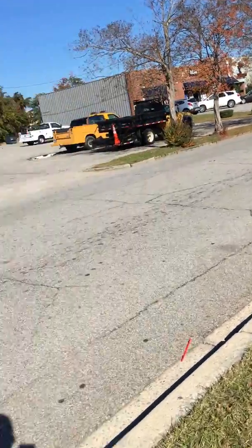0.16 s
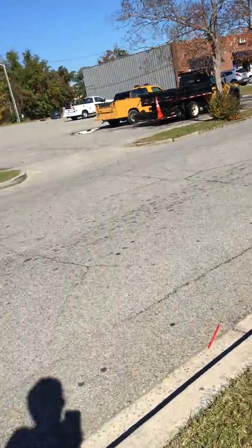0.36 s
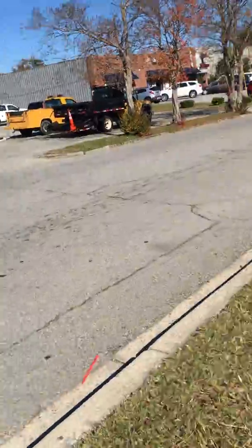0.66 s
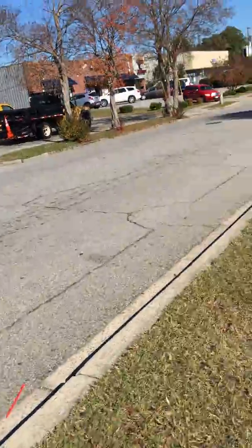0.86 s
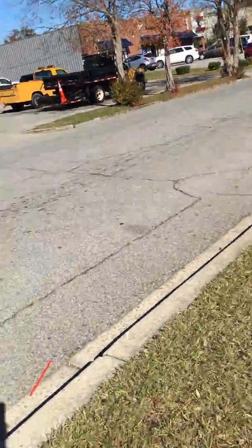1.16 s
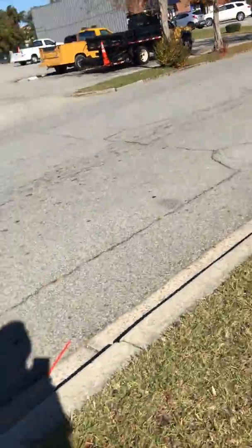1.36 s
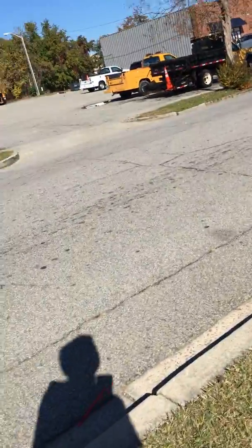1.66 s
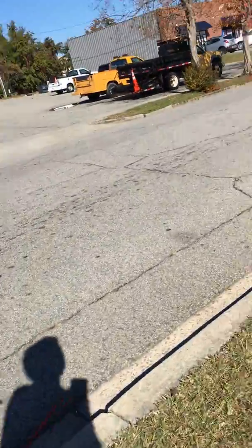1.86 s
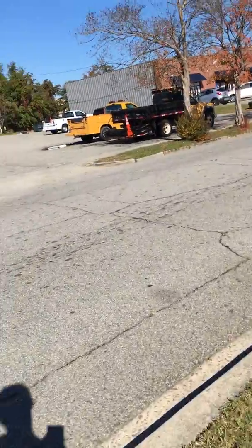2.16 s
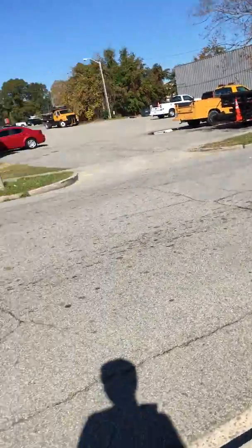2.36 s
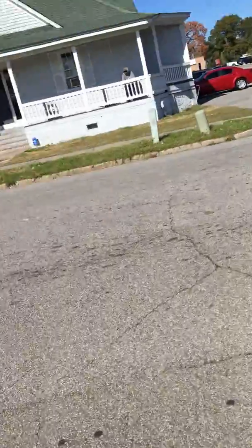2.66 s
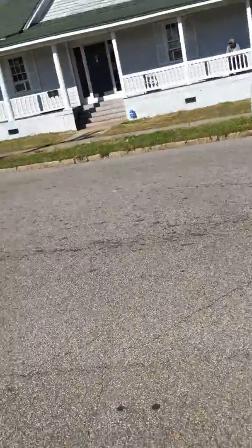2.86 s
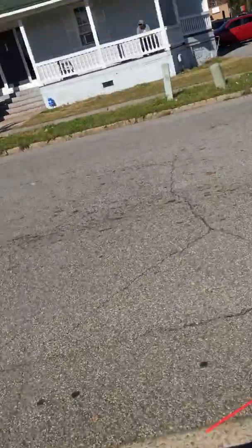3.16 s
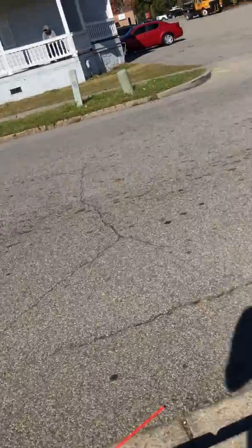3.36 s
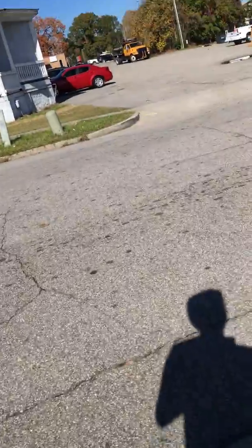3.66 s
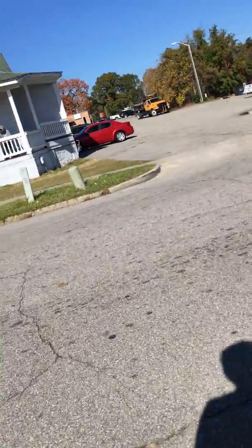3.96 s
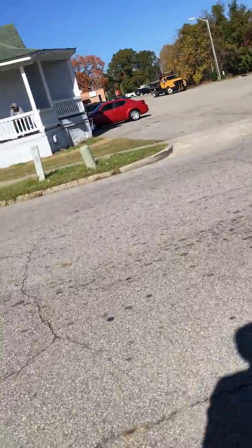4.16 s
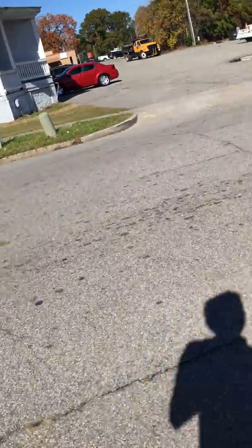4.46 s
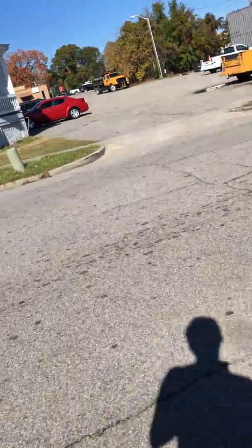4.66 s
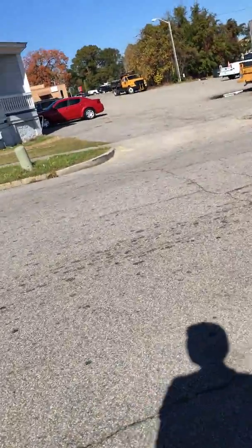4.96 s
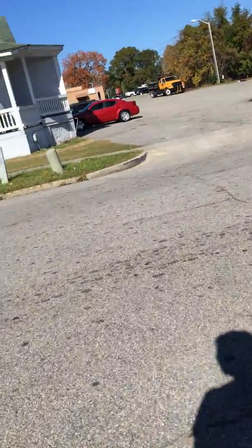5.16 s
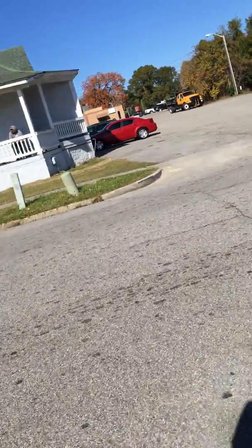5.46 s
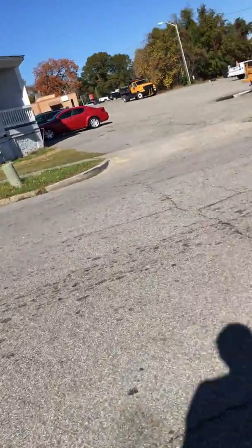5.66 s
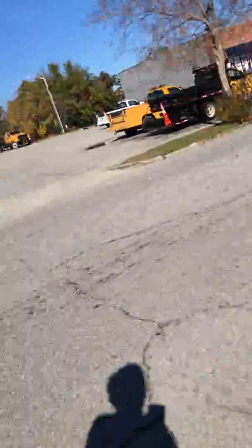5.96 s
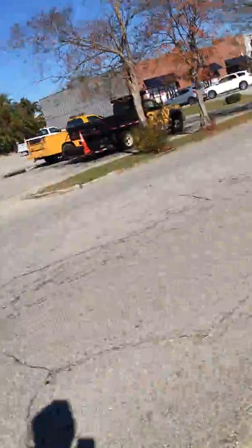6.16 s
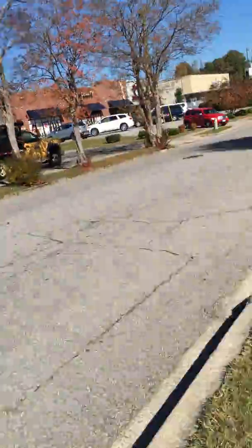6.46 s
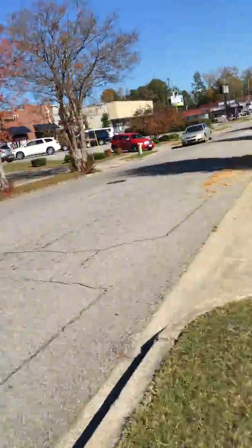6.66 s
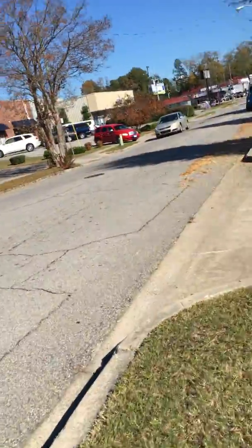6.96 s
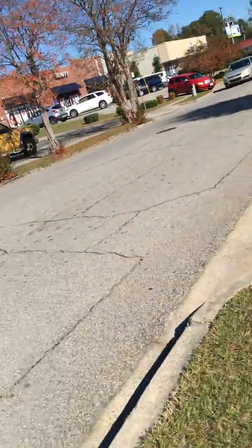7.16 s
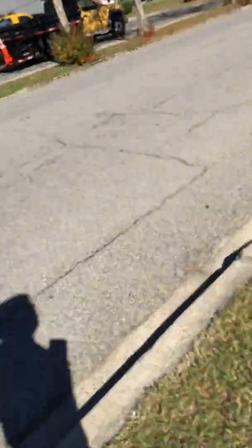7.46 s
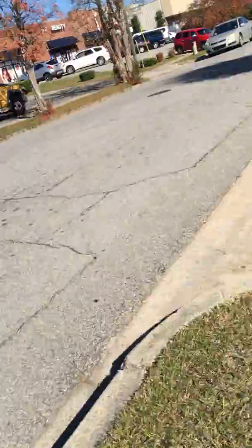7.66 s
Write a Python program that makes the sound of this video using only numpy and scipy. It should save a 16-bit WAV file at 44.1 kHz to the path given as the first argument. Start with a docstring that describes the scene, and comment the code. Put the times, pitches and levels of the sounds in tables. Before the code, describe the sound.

Distant traffic rumbles throughout, heard outdoors from a side street, with a soft tyre hiss and low exhaust notes that swell and fade, strongest around 2.5, 3.5 and 5 seconds. A parked diesel truck hums and rattles quietly underneath, and insects trill very faintly. The microphone takes three dull bumps in the first second. Close by, feet shuffle softly on dry grass, with light swishes and tiny stalk snaps scattered from about 1 second onward, clearer around 3.4, 4.3 and 5 seconds. From about 5.2 seconds an approaching car adds a low engine drone, and its tyre noise slowly grows toward the end. Two more dull bumps hit the microphone at about 6.5 seconds. A barely audible, thin, high brake squeak rises between 7.1 and 7.5 seconds, ending with a small crisp snap of grass while the traffic carries on.

```python
"""Side street beside a busy road.

Distant traffic rumbles and hisses; low exhaust notes swell and fade. A parked diesel hums, knocks and
rattles. Insects scrape trills in the verge. Close by, feet shuffle on dry grass, stalks snap and the
microphone housing takes a few dull bumps. Late on, a car rolls nearer with a thin brake squeak."""
import sys
import numpy as np
from scipy import signal
from scipy.fft import rfft, irfft, next_fast_len
from scipy.io import wavfile

SR = 44100
rng = np.random.default_rng(int(sys.argv[2]) if len(sys.argv) > 2 else 0)


def unload_audio(sound):
    """Save the sound as a 16-bit wav file, at the path given as the first command line argument."""
    columns = np.transpose(np.atleast_2d(sound))
    # keep every value between -1 and 1, then stretch to whole-number steps
    steps = np.round(np.clip(columns, -1, 1) * 32767)
    wavfile.write(sys.argv[1], SR, steps.astype(np.int16))


N = 343980

# Each row: pulse rate in Hz, wing resonance in Hz, width in Hz, relative level in dB.
INSECT_SONGS = [(111, 5370, 230, -77.5), (41.2, 5450, 320, -81), (16.24, 5330, 280, -81),
                (70.8, 6350, 200, -83.5)]
# Each row: time in seconds, level of all insects in dB.
CHORUS_LEVEL = [(0, -72), (.9, -72.5), (2.5, -68.5), (2.7, -74), (3, -80), (3.28, -69.5), (5.2, -71),
                (5.42, -70), (5.5, -75), (6.2, -75), (6.35, -71), (6.6, -71), (7.13, -67), (7.47, -71),
                (7.8, -63)]
# Diesel hum. Each row: multiple of the firing rate, level in dB.
IDLE_ORDERS = [(1, -50.5), (5, -62), (9, -57.5), (10, -72.5)]
# Diesel resonances. Each row: centre in Hz, width in Hz, level in dB.
BLOCK_MODES = [(980, 560, -81.5), (1730, 740, -64.5), (3380, 1500, -77.5)]
PANEL_MODES = [(1100, 530, -62.5), (1980, 1800, -82.5)]
# Noise spectra. Each row: frequency in Hz, relative density in dB.
RUMBLE_SPECTRUM = [(20, -24), (35, -6), (50, -2), (70, -1), (100, -1.5), (140, -10), (180, -12.5),
                   (260, -30.5)]
ROAR_SPECTRUM = [(76, -44.5), (130, -11), (156, -5), (249, -7), (349, -12.5), (398, -21), (496, -25.5),
                 (700, -36), (910, -67.5), (1540, -120)]
FAR_TYRE_SPECTRUM = [(240, -14), (400, -0.5), (503, -5.5), (738, -6.5), (860, -4.5), (1080, -7.5),
                     (1190, -6.5), (1400, -10.5), (2400, -17), (2760, -24), (3360, -24.5), (4930, -29.5),
                     (5400, -25), (6800, -39), (15600, -59.5)]
NEAR_TYRE_SPECTRUM = [(350, -34), (550, 1.5), (950, 1.5), (1400, 3), (1900, -2.5), (2700, -31),
                      (3400, -16.5), (5000, -22), (8000, -31), (15600, -51)]
CRACKLE_SPECTRUM = [(2000, -17), (3500, 12.5), (6000, -5.5), (9000, 5), (12000, 0.5), (15700, -2.5)]
SWISH_SPECTRUM = [(1200, 1), (2500, 9), (4000, 5.5), (6000, 1), (8500, -7), (11000, -15), (15700, -23)]
# Far engine rumble and near tyres. Each row: time in seconds, level in dB.
RUMBLE_LEVEL = [(0, -36), (.3, -34.5), (.52, -33.5), (.63, -40), (.9, -32), (1.1, -41), (1.34, -35.5),
                (1.95, -34.5), (2.47, -32.5), (3, -39), (3.65, -31), (3.8, -38), (4.3, -33), (5, -33.5),
                (5.4, -35), (5.6, -39), (6.36, -33), (6.56, -43.5), (6.7, -34.5), (7.5, -37.5),
                (7.75, -43.5)]
NEAR_TYRE_LEVEL = [(5.2, -61), (5.8, -57), (6.3, -55), (6.7, -50.5), (7.1, -48.5), (7.5, -51), (7.8, -44)]
# Each row: time in seconds, body roar in dB, tyre hiss in dB.
TRAFFIC_LEVELS = [(0, -49.5, -48.5), (.7, -45, -48), (1.5, -46.5, -50), (2.1, -45, -50), (2.6, -47.5, -51),
                  (3.05, -45, -51), (3.5, -46.5, -49), (4, -45, -49.5), (4.5, -44.5, -49.5), (5, -46, -50),
                  (5.3, -42, -48.5), (5.7, -44.5, -49), (6.1, -45, -49.5), (7, -45.5, -48),
                  (7.8, -43.5, -49)]
# Road noise bands. Each row: centre in Hz, width in Hz, steady level in dB, swells.
# Each swell: start in seconds, length in seconds, level in dB.
RINGING_BANDS = [(950, 65, -63, [(-.1, .4, -65), (.5, 0.55, -62), (2.6, 0.24, -62), (4.1, .7, -62.5),
                 (6.25, .75, -54.5), (7.45, .6, -53)]), (1208.5, 95, -63, [(.75, 0.99, -60),
                 (2.05, .4, -70), (3.35, 1.37, -74), (6, 1.0, -63), (7.4, 0.46, -69)]),
                 (3365, 140, -76.5, [(-.1, 2.2, -77), (3.3, .3, -78), (6.2, 0.41, -70), (6.85, 1.17, -73)])]
# Three engine drones, one list each: two in the distant traffic, then the approaching car's.
# Each row: time in seconds, pitch in Hz, level in dB.
ENGINE_TRACKS = [
    [(.15, 127.1, -43), (.35, 127.4, -39.5), (1.2, 135, -40), (2.1, 135.4, -43), (2.4, 136.4, -47),
     (3.3, 139.1, -40), (4.05, 140.9, -52.5)],
    [(1.4, 119.5, -41), (1.7, 119, -34.5), (2.4, 121.3, -38.5), (3, 122.9, -45.5), (3.6, 124.7, -42.5),
     (4.5, 125.4, -45.5), (4.8, 123.3, -36), (5.05, 122, -42)],
    [(5.22, 112, -39), (5.35, 112.4, -36), (5.69, 112.3, -44), (5.87, 105.7, -30), (6.09, 101.8, -30),
     (6.3, 102.7, -35.5), (6.38, 102.8, -27), (6.53, 103.3, -44), (6.68, 102.8, -32), (7, 103.4, -35),
     (7.17, 105.7, -32.5), (7.62, 105.3, -38), (7.75, 100, -49)],
]
# Each row: start in seconds, length in seconds, first pitch in Hz, last pitch in Hz, level in dB.
EXHAUST_NOTES = [(-.1, 0.7, 72.5, 73.1, -33), (.7, .29, 73, 69.2, -33), (.25, 1.1, 140.7, 151.5, -46),
                 (1.25, 0.21, 80.8, 84.6, -32), (1.3, 0.7, 95.5, 101, -44), (1.72, 0.18, 74.4, 74.6, -30),
                 (2.06, 0.28, 64.1, 61, -27.5), (2.42, 0.096, 60.2, 58.3, -23), (2.53, .2, 61.4, 59, -29.5),
                 (2.72, 0.34, 57.8, 55.7, -27.5), (2.7, 0.47, 167.3, 170.8, -43),
                 (3, 0.92, 85.66, 91.2, -40), (3.7, 0.34, 90.2, 93, -49), (3.42, 0.18, 59.5, 57.4, -23),
                 (3.8, 0.63, 53.4, 54.9, -36), (4.33, 0.077, 103, 103, -29),
                 (4.48, 0.21, 102.5, 107, -30.5), (4.42, 0.32, 164, 165, -43.5),
                 (4.5, 0.55, 67, 64.3, -30.5), (4.78, 0.13, 62.1, 56, -30.5),
                 (4.85, 0.29, 52.9, 50.9, -25.5), (4.68, 0.21, 210, 213, -42), (5.25, 0.34, 84, 84.5, -37),
                 (5.55, 0.5, 84.2, 89, -40), (5.6, .58, 56.5, 59.3, -32.5), (5.68, 0.23, 217, 206, -50.5),
                 (5.95, 0.28, 175.3, 183.9, -40.5), (6.22, 0.1, 60, 59.3, -25),
                 (6.8, 0.86, 60.7, 61.3, -35.5), (7.05, 0.42, 45.5, 45.4, -40),
                 (7.35, 0.45, 168.2, 166, -47)]
# Brake squeak. Each row: time in seconds, pitch in Hz, level in dB.
SQUEAK_TRACK = [(7.1, 11900, -96), (7.3, 12400, -92), (7.41, 12650, -92), (7.44, 12830, -83),
                (7.514, 12893, -86), (7.53, 12800, -80)]
# Short impacts. Each row: start in seconds, peak in dB, centre in Hz.
HOUSING_BUMPS = [(.015, -21.5, 208), (.519, -20.5, 93.5), (.949, -20, 102), (6.439, -24, 182),
                 (6.476, -21.5, 129.5)]
STALK_SNAPS = [(0.8738, -61, 9100), (1.165, -60, 12300), (1.265, -62, 10000), (1.379, -62, 11000),
               (1.4778, -60, 11000), (2.36, -63, 11260), (2.80, -64, 11000), (3.1328, -53, 7150),
               (3.297, -49, 6000), (3.4058, -49, 12400), (3.412, -50, 13000), (3.45, -47, 12000),
               (3.516, -46, 7970), (4.3316, -51, 10200), (4.5052, -55, 7020), (4.6299, -53, 9000),
               (5.0927, -45, 12500), (5.8522, -54, 10100), (6.42, -52, 14200), (6.6946, -46, 9080),
               (7.3064, -58, 7400), (7.4052, -56, 9030), (7.5263, -39.5, 12500)]
# Constant stir of the grass. Each row: time in seconds, crackle in dB, swish in dB.
GRASS_STIR = [(0, -78, -64), (1.5, -81, -73), (2.5, -79.5, -73.5), (3.5, -78, -71), (4.2, -81.5, -71),
              (6, -83, -81.5), (6.7, -79.5, -67.5), (7.8, -77, -67)]
# Each row: start in seconds, hold in seconds, rise in dB/s, fall in dB/s, crackle in dB, swish in dB.
FOOT_SCUFFS = [(1.15, 0.18, 40, 35, -82.5, -66.5), (1.96, .03, 150, 60, -84, -76),
               (2.8, 0.018, 150, 150, -91, -73), (3.22, .1, 200, 60, -76, -64),
               (3.41, .03, 900, 100, -69, -76), (3.464, 0.065, 201, 600, -66, -64.5),
               (3.615, 0.055, 100, 52, -78, -68), (4.235, .05, 150, 95, -78, -67),
               (4.335, 0.033, 600, 350, -68.5, -62), (4.437, 0.018, 100, 200, -78, -75),
               (4.61, 0.052, 70, 85, -83, -65), (4.936, 0.018, 106, 100, -82, -76),
               (5.064, .04, 298, 700, -70, -68), (5.14, 0.036, 100, 70, -77, -71),
               (5.493, 0.091, 89, 300, -74, -73), (5.666, 0.11, 600, 100, -70, -70),
               (6.24, 0.06, 199, 60, -74.5, -72), (6.37, 0.034, 120, 500, -64.5, -72),
               (6.537, 0.045, 64, 58, -84, -67), (6.929, .03, 100, 80, -80, -64),
               (7.4, .15, 33, 40, -78, -79)]
# Microphone port cavities. Each row: centre in Hz, width in Hz, depth from 0 to 1.
PORT_NOTCHES = [(4970, 390, 0.33), (10370, 850, 0.4)]


def from_db(db):
    """Decibels to gain."""
    return 10 ** (np.asarray(db) / 20)


def unit_rms(x):
    """Scale to rms 1."""
    return x / np.sqrt(np.mean(x ** 2) + 1e-20)


def curves(rows):
    """Each column after the time, interpolated over all samples."""
    times_s, *columns = np.transpose(rows)
    return [np.interp(np.arange(N) / SR, times_s, column) for column in columns]


def drift(rate_hz):
    """Low-passed random wander, spread 1."""
    step, settle = 40, 2000
    pole = np.exp(-2 * np.pi * rate_hz * step / SR)
    noise = rng.standard_normal(N // step + settle + 2)
    slow = signal.lfilter([1], [1, -2 * pole, pole * pole], noise)[settle:]
    return np.interp(np.arange(N) / step, np.arange(len(slow)), unit_rms(slow - slow.mean()))


def coloured(white, spectrum):
    """Shape a white signal to a spectrum; rms 1."""
    hz, level_db = np.transpose(spectrum)
    size = next_fast_len(N)
    bins_hz = np.maximum(np.arange(size // 2 + 1) * SR / size, 1)
    gain = from_db(np.interp(np.log(bins_hz), np.log(hz), level_db, left=-120, right=-120))
    return unit_rms(irfft(rfft(white, size) * gain, size)[:N])


def lumpy_noise(spectrum, level_db, lumps_db, rate_hz):
    """Coloured noise with a wandering level."""
    return from_db(level_db + lumps_db * drift(rate_hz)) * coloured(rng.standard_normal(N), spectrum)


def resonance(x, hz, width_hz):
    """Two-pole peak, gain 1."""
    r = np.exp(-np.pi * width_hz / SR)
    feedback = [1, -2 * r * np.cos(2 * np.pi * hz / SR), r * r]
    return signal.lfilter(np.array([1, 0, -1]) * (1 - r * r) / 2, feedback, x)


def steep_resonance(x, hz, width_hz):
    """Two wider peaks in series for steep skirts; rms 1."""
    stage_width_hz = 1.55 * width_hz
    return unit_rms(resonance(resonance(x, hz, stage_width_hz), hz, stage_width_hz))


def puffs(rate_hz, sharpness, pattern_db=(0,)):
    """Noise gated once a cycle; strengths repeat in a pattern."""
    cycles = np.cumsum(rate_hz * (1 + 0.0052 * drift(0.57))) / SR
    gate = (.5 + .5 * np.cos(2 * np.pi * cycles)) ** sharpness
    strength = from_db(pattern_db)[np.round(cycles).astype(int) % len(pattern_db)]
    return gate * strength * rng.standard_normal(N)


def swell(start_s, length_s, rise_s, fall_s):
    """Gain 0-1: smooth rise, hold, smooth fall."""
    t = np.arange(N) / SR - start_s
    rising = t / min(rise_s, length_s / 2)
    falling = (length_s - t) / min(fall_s, length_s / 2)
    return np.sin(np.pi / 2 * np.clip(np.minimum(rising, falling), 0, 1)) ** 2


def gliding_tone(track, waver_db, fade_s):
    """Sine along a track, faded at both ends; moving air wavers level and phase."""
    hz, level_db = curves(track)
    t = np.arange(N) / SR
    inside_s = np.minimum(t - track[0][0], track[-1][0] - t)
    fade = np.clip(inside_s / fade_s + .5, 0, 1)
    phase = 2 * np.pi * (np.cumsum(hz) / SR + rng.random()) + .3 * drift(4)
    return np.sqrt(2) * fade * from_db(level_db + waver_db * drift(3.2)) * np.sin(phase)


def insects():
    """Each insect scrapes short pulses into a wing resonance."""
    chorus_db, = curves(CHORUS_LEVEL)
    songs = sum(from_db(db) * steep_resonance(puffs(pulse_hz, sharpness=4), hz, width_hz)
                for pulse_hz, hz, width_hz, db in INSECT_SONGS)
    return from_db(chorus_db) * unit_rms(songs)


def idling_diesel(firing_hz=44.5, rattle_hz=16.7):
    """Firing orders hum; knock rings the block, unevenly by cylinder; a loose panel rattles."""
    firings = np.cumsum(firing_hz * (1 + 0.00392 * drift(0.531))) / SR
    hum = sum(from_db(db + 3 * drift(2.5)) * np.sin(2 * np.pi * order * firings)
              for order, db in IDLE_ORDERS)
    knock = puffs(firing_hz, sharpness=1.2, pattern_db=[10, 10, 4, -4.5])
    rattle = puffs(rattle_hz, sharpness=11)
    block = sum(from_db(db) * steep_resonance(knock, hz, width_hz) for hz, width_hz, db in BLOCK_MODES)
    panel = sum(from_db(db) * steep_resonance(rattle, hz, width_hz) for hz, width_hz, db in PANEL_MODES)
    return hum + block + panel


def road_ringing(fade_s=0.26):
    """Narrow bands of road noise, faint between swells."""
    out = np.zeros(N)
    for hz, width_hz, steady_db, swells in RINGING_BANDS:
        phase = 2 * np.pi * hz * np.arange(N) / SR
        swelling = sum(from_db(db) * swell(start_s, length_s, fade_s, fade_s)
                       for start_s, length_s, db in swells)
        band = drift(width_hz) * np.sin(phase) + drift(width_hz) * np.cos(phase)
        out += (from_db(steady_db) + swelling) * band
    return out


def far_traffic():
    """Many engines and tyres blend into lumpy noise."""
    rumble_db, = curves(RUMBLE_LEVEL)
    roar_db, hiss_db = curves(TRAFFIC_LEVELS)
    rumble = lumpy_noise(RUMBLE_SPECTRUM, rumble_db, lumps_db=2.5, rate_hz=3.2)
    roar = lumpy_noise(ROAR_SPECTRUM, roar_db, lumps_db=1.34, rate_hz=16)
    hiss = lumpy_noise(FAR_TYRE_SPECTRUM, hiss_db, lumps_db=1.1, rate_hz=17)
    return rumble + roar + hiss


def exhausts():
    """One low order per engine: two distant drones, then the approaching car's; many brief glides."""
    out = sum(gliding_tone(track, waver_db=2, fade_s=.12) for track in ENGINE_TRACKS)
    wavers_db = [1.3 * drift(6) for _ in range(4)]
    for k, (start_s, length_s, first_hz, last_hz, level_db) in enumerate(EXHAUST_NOTES):
        hz = np.interp(np.arange(N) / SR, [start_s, start_s + length_s], [first_hz, last_hz])
        sine = np.sqrt(2) * np.sin(2 * np.pi * (np.cumsum(hz) / SR + rng.random()))
        envelope = swell(start_s, length_s, rise_s=.11, fall_s=.14)
        out += from_db(level_db + wavers_db[k % 4]) * envelope * sine
    return out


def nearing_tyres():
    """The approaching car's tyre noise grows out of the traffic."""
    level_db, = curves(NEAR_TYRE_LEVEL)
    return lumpy_noise(NEAR_TYRE_SPECTRUM, level_db, lumps_db=2.3, rate_hz=8)


def brake_squeak():
    """A brake sings one thin, rising tone."""
    return gliding_tone(SQUEAK_TRACK, waver_db=1.5, fade_s=0.015)


def housing_bumps(decay_cycles=0.56):
    """Each bump rings the housing at a low, heavily damped pitch."""
    out = np.zeros(N)
    for start_s, peak_db, hz in HOUSING_BUMPS:
        cycles = hz * np.arange(int(6 * decay_cycles / hz * SR)) / SR
        envelope = (1 - np.exp(-6 * cycles)) * np.exp(-cycles / decay_cycles)
        bump = envelope * np.sin(2 * np.pi * cycles)
        at = round(start_s * SR)
        out[at:at + len(bump)] += (from_db(peak_db) * bump / np.abs(bump).max())[:N - at]
    return out


def stalk_snaps(decay_s=0.0011):
    """A dry stalk breaks in a brief noise burst around its own pitch."""
    out = np.zeros(N)
    t = np.arange(400) / SR
    for start_s, peak_db, hz in STALK_SNAPS:
        burst = rng.standard_normal(len(t)) * np.exp(-t / decay_s)
        snap = resonance(burst, hz, width_hz=.4 * hz)
        at = round(start_s * SR)
        out[at:at + len(snap)] += from_db(peak_db) * snap / np.abs(snap).max()
    return out


def shuffling(grains_per_s=2500):
    """Grass blades crackle in dense, uneven grains; the sole brushes through with a duller swish."""
    crackle_gain, swish_gain = from_db(curves(GRASS_STIR))
    t = np.arange(N) / SR
    for start_s, hold_s, rise_db_per_s, fall_db_per_s, crackle_db, swish_db in FOOT_SCUFFS:
        drop_db = np.maximum(rise_db_per_s * (start_s - t), fall_db_per_s * (t - start_s - hold_s))
        envelope = from_db(-np.maximum(drop_db, 0))
        crackle_gain += from_db(crackle_db) * envelope
        swish_gain += from_db(swish_db) * envelope
    sizes = from_db(5.5 * np.minimum(rng.exponential(1, N), 4))
    signs = rng.choice([-1, 1], N)
    onsets = rng.random(N) < grains_per_s * from_db(2.5 * drift(60)) / SR
    grains = unit_rms(sizes * signs * onsets)
    crackle = coloured(.5 * grains + 0.58 * rng.standard_normal(N), CRACKLE_SPECTRUM)
    swish = coloured(rng.standard_normal(N) * from_db(2.1 * drift(14)), SWISH_SPECTRUM)
    flicker = from_db(1.1 * drift(30))
    return crackle_gain * flicker * crackle + swish_gain * swish


def scene():
    """Mono sum of all sources."""
    near = shuffling() + stalk_snaps() + housing_bumps()
    road = far_traffic() + nearing_tyres() + road_ringing() + exhausts()
    return (near + road + idling_diesel() + insects() + brake_squeak())[None]


def record(dry, low_cut_hz=25, high_cut_hz=15735):
    """Port cavities notch the treble; deep bass is rolled off, the top cut steeply."""
    for hz, width_hz, depth in PORT_NOTCHES:
        dry = dry - depth * resonance(dry, hz, width_hz)
    dry = signal.sosfilt(signal.butter(2, low_cut_hz, "high", fs=SR, output="sos"), dry)
    return signal.sosfilt(signal.ellip(14, .5, 80, high_cut_hz, fs=SR, output="sos"), dry)


dry = scene()
out = record(dry)
unload_audio(out)
```